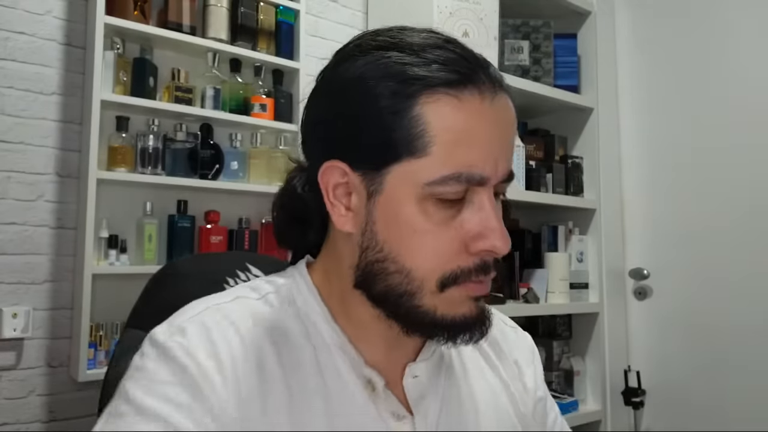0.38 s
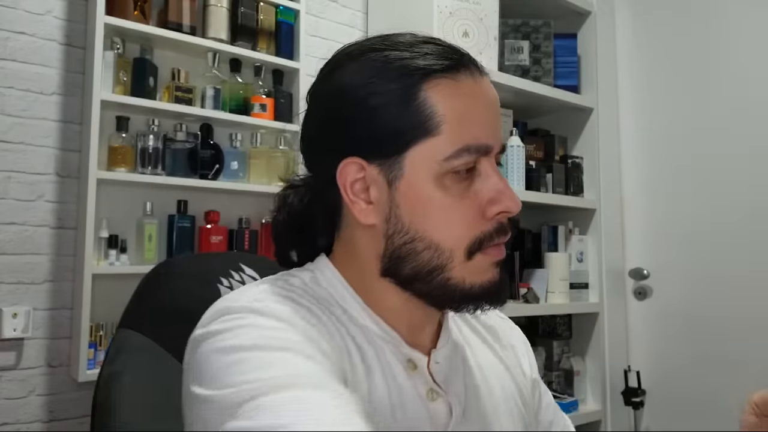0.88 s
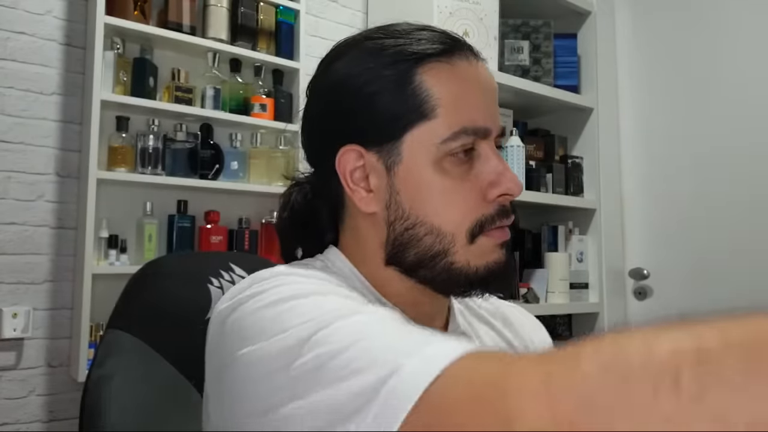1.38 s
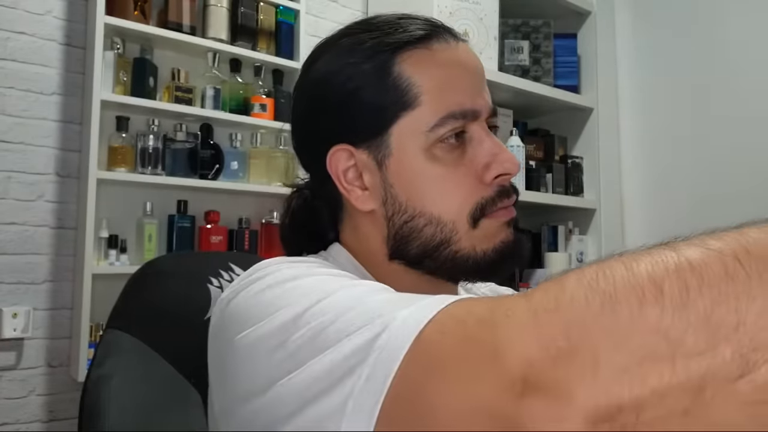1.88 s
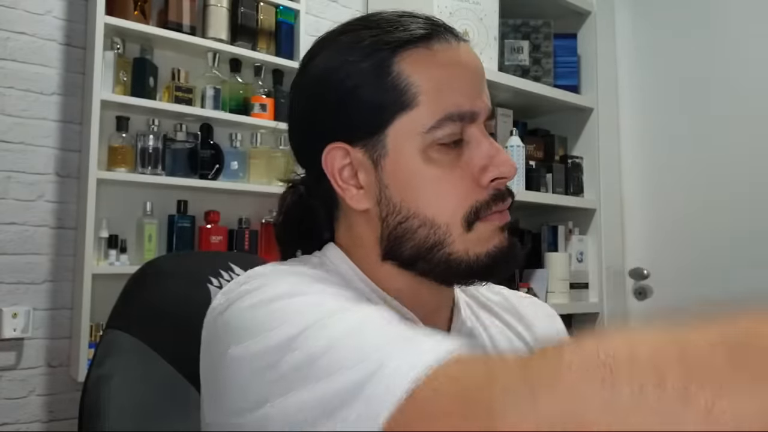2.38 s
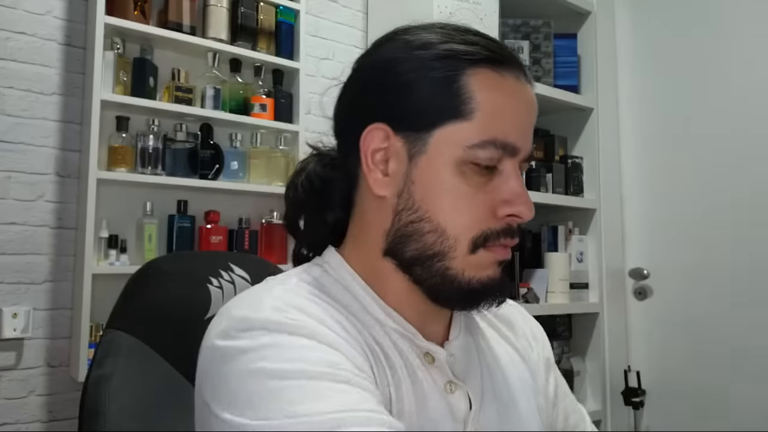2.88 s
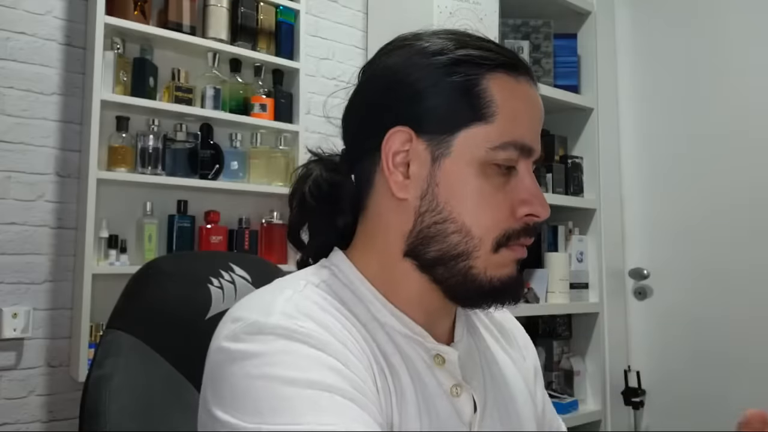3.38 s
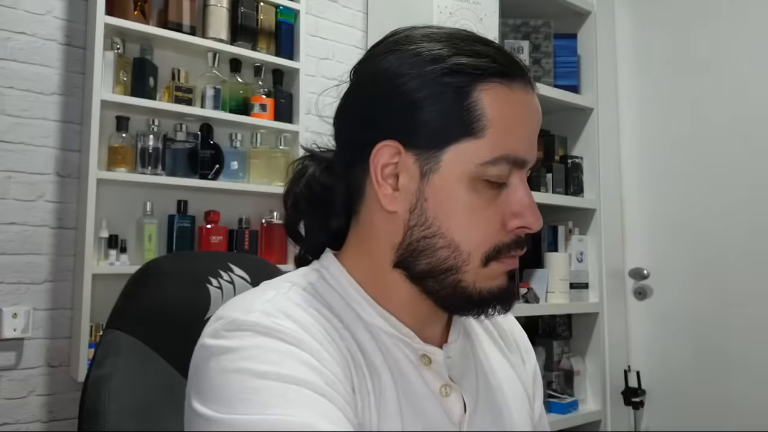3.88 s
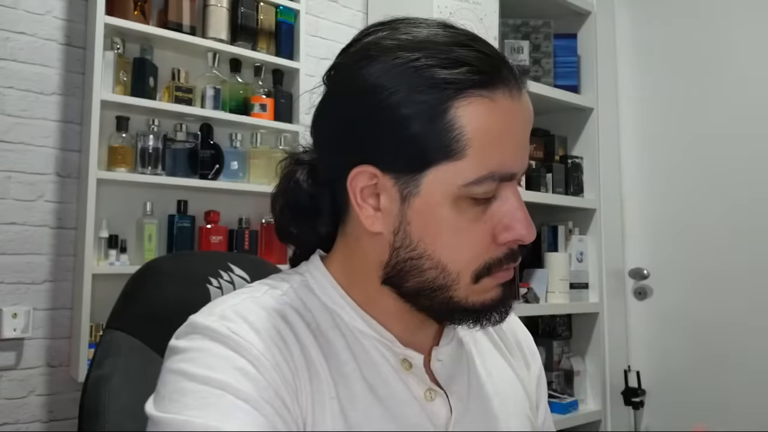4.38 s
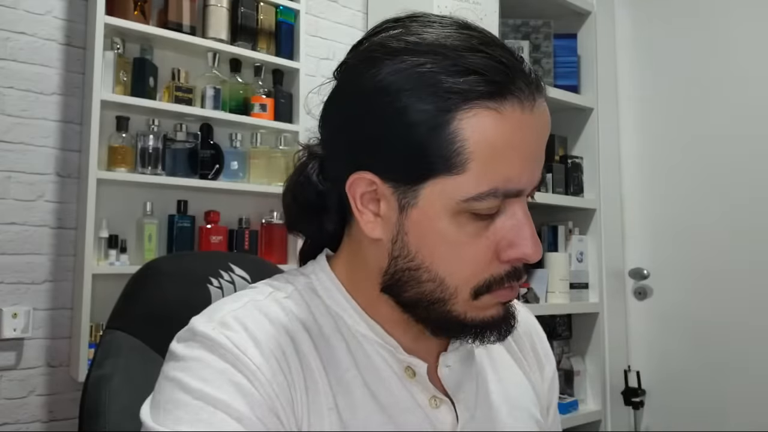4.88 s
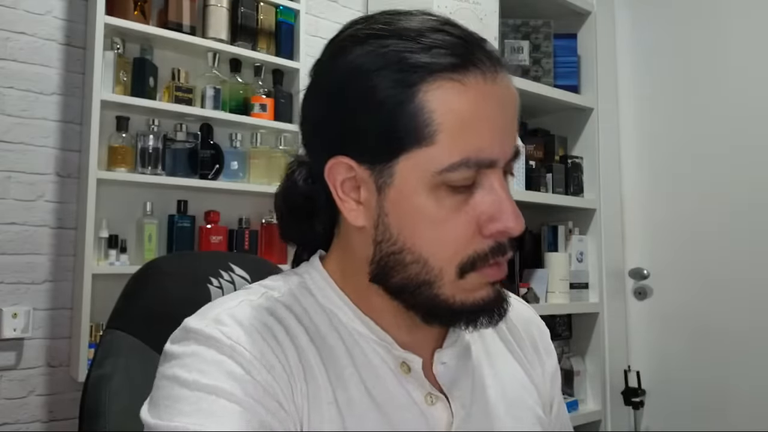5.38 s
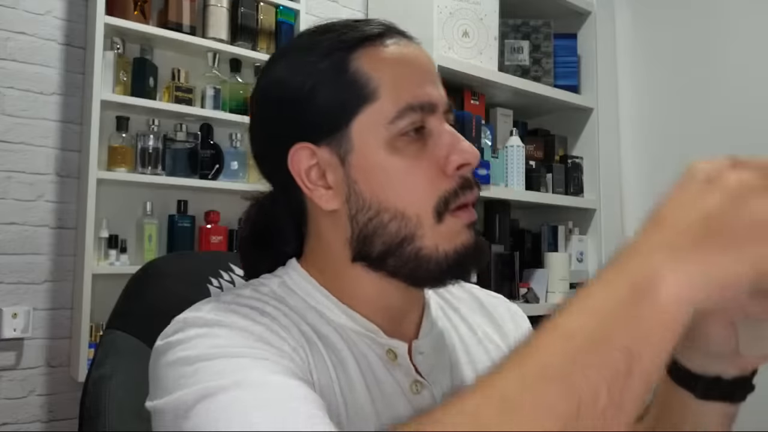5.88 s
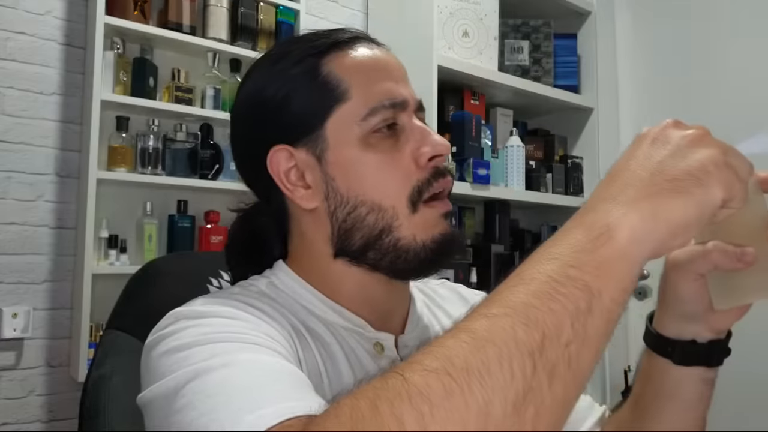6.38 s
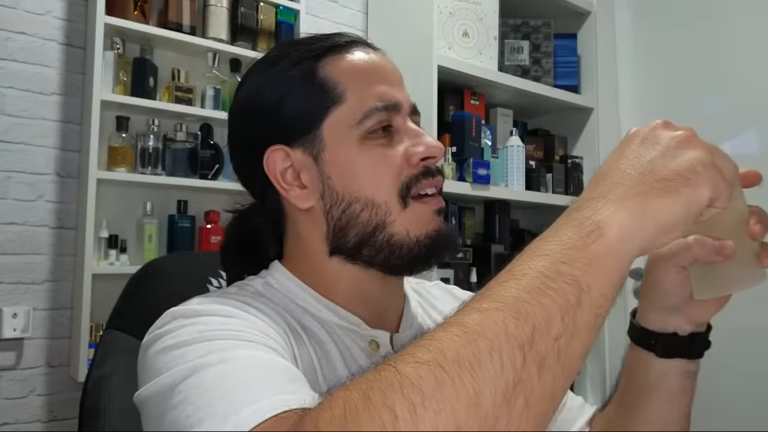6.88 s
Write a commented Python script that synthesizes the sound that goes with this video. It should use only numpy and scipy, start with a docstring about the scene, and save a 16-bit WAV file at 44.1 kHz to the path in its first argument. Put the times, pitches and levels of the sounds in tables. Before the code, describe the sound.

In a small quiet room, cloth rustles, a cap clicks off, a bottle knocks heavily on a wooden desk, then chirps and short spray puffs.

```python
"""Bottle and cap at a desk

A glass bottle and its cap are handled at a wooden desk in a small furnished room, over a low wavering rumble.
Knocks ring the desk top's modes and add a woody clack and bursts of noise; the cap slips off in dying rattles.
Hands and sleeves rustle in strokes of noise, and small ticks and peeps are scratches in narrow resonances.
Thin chirps are whistles with a rasp around them, and the pump's puffs are short bursts of bright hiss."""
import sys
import numpy as np
from scipy import signal
from scipy.fft import rfft, irfft, next_fast_len
from scipy.io import wavfile

SR = 44100
rng = np.random.default_rng(int(sys.argv[2]) if len(sys.argv) > 2 else 0)


def wav_record(signal):
    """Record a signal, one row per channel, as 16-bit PCM in the file named by sys.argv[1]."""
    frames = np.transpose(np.atleast_2d(signal))
    bounded = np.clip(frames, -1, 1)
    # unit amplitude maps onto the largest positive 16-bit level
    quanta = np.round(bounded * 32767).astype(np.int16)
    wavfile.write(sys.argv[1], SR, quanta)


def voltage_ratio(decibels):
    """Convert decibels (scalar or array-like) to amplitude ratios, 20 dB per decade."""
    exponent = np.asarray(decibels, float) / 20
    return 10 ** exponent


N = 319266   # length in samples


def rms_one(x):
    """Scale a sound so that its rms, a kind of average strength, is 1."""
    return x / np.sqrt(np.mean(x ** 2) + 1e-20)


def in_time(rows):
    """Join the points of a table with straight lines and give each column sample by sample."""
    s, *columns = np.transpose(rows)
    return [np.interp(np.arange(N) / SR, s, column) for column in columns]


def while_on(rows, release_s=0.0025):
    """One between the first and last time of a table, zero outside, with sloping edges."""
    t = np.arange(N) / SR
    inside_s = np.minimum(t - rows[0][0], rows[-1][0] - t)
    return np.clip(1 + inside_s / release_s, 0, 1)


def at_hz(points, hz):
    """Read a table between its points, on a log-frequency axis."""
    table_hz, values = np.array(points).T
    return np.interp(np.log(np.maximum(hz, 1)), np.log(table_hz), values)


def coloured(spectrum):
    """Noise shaped to the given spectrum, with rms 1."""
    size = next_fast_len(N)
    shape = voltage_ratio(at_hz(spectrum, np.fft.rfftfreq(size, 1 / SR)))
    white = rng.standard_normal(size)
    return rms_one(irfft(rfft(white) * shape, size)[:N])


def drift(rate_hz):
    """Smooth random wandering with rms 1, made of noise with its faster changes filtered away."""
    r = np.exp(-2 * np.pi * rate_hz / SR)
    wander = signal.lfilter([1], [1, -2 * r, r * r], rng.standard_normal(N + SR))
    return rms_one(wander[SR:])   # the first second lets the filter settle


def resonance(x, hz, width_hz):
    """One resonance: it passes sound near its pitch, with gain 1 on top."""
    r = np.exp(-np.pi * max(width_hz, 10) / SR)
    turn = 2 * np.pi * hz / SR
    return signal.lfilter([(1 - r * r) / 2, 0, (r * r - 1) / 2], [1, -2 * r * np.cos(turn), r * r], x)


def dull(x, cut_hz):
    """Take away the treble with a steep low-pass."""
    return signal.sosfilt(signal.butter(4, cut_hz, fs=SR, output="sos"), x)


def dying(times, level_db, t60):
    """Gain that rises within about a millisecond at each blow and dies by 60 dB in t60 seconds."""
    clicks = np.zeros(N)
    clicks[(times * SR).astype(int)] = voltage_ratio(level_db)
    fall = signal.lfilter([1], [1, -voltage_ratio(-60 / (t60 * SR))], clicks + 1e-18)
    return signal.lfilter([.025], [1, -.975], fall)   # softens the start


def strokes(times, peak_db, swell_s, fade_s):
    """Gain over time of separate strokes, each swelling to its peak and fading."""
    drop_db = 23      # loss one swell before the peak and one fade after it
    roundness = 1.2   # 1 is a pointed peak, 2 a round one
    out, t = np.zeros(N), np.arange(N) / SR
    for s, level_db, before, after in zip(times, peak_db, swell_s, fade_s):
        near = slice(max(int((s - 3 * before) * SR), 0), int((s + 3 * after) * SR))
        away = np.maximum((s - t[near]) / before, (t[near] - s) / after)
        out[near] += voltage_ratio(level_db - drop_db * away ** roundness)
    return out


def low_rumble():
    """Bands of noise for hum, rumble and scuff, which waver and swell when the desk is pushed or shaken."""
    # Slow level of the low room sound. Each row: time in seconds, hum level in dB, rumble level in dB.
    low_bed = [(0, -72, -64), (.42, -62, -64), (.85, -73.5, -68.5), (1.1, -57.5, -65.5), (1.3, -58.5, -67),
               (1.55, -73, -69.5), (1.87, -60.5, -64), (2.02, -82, -69), (2.19, -53, -64),
               (2.57, -86, -76.5), (2.82, -53.5, -63), (3.2, -82, -70), (3.68, -74, -71), (4.3, -68, -70.5),
               (4.73, -67.5, -84), (5, -81, -88), (5.23, -68, -68.5), (6.6, -66, -65.5), (6.9, -79, -67.5)]
    # The desk is pushed, brushed or left shaking by knocks. Each row: time of the peak in seconds,
    # hum level in dB, rumble level in dB, swell in seconds, fade in seconds.
    leans = [(.11, -38, -64, 0.071, 0.093), (3.33, -43.5, -54.5, 0.097, 0.16),
             (3.745, -65, -45, .045, 0.045), (4.009, -32, -51, .06, 0.11), (4.21, -43.5, -58, 0.044, 0.062),
             (7.04, -44.5, -49.5, .1, 0.17)]
    # Noise colours. Each row: frequency in Hz, relative level in dB per Hz.
    hum_tone = [(30, -60), (95, -16), (120, 0.5), (150, -14.5), (300, -63)]   # lowest mode of the desk
    rumble_tone = [(94, -30.5), (160, 1.5), (188, -10), (231, -2.5), (259, -7.5), (318, -9), (366, -26.5),
                   (420, -19), (550, -46.5), (920, -120)]
    scuff_tone = [(240, -34.5), (400, -5), (615, 1.5), (996, -14), (1250, -14.5), (2250, -24.5),
                  (2500, -28), (3250, -38.5), (5500, -120)]
    waver_hz, hum_waver_db, rumble_waver_db = 6, 2, 2.5
    scuff_db = -14.5   # scuff level against the rumble

    s, hum_db, rumble_db, swell_s, fade_s = np.transpose(leans)
    bed_hum_db, bed_rumble_db = in_time(low_bed)
    bed_hum = voltage_ratio(bed_hum_db + hum_waver_db * drift(waver_hz))
    bed_rumble = voltage_ratio(bed_rumble_db + rumble_waver_db * drift(waver_hz))
    pushed_hum = strokes(s, hum_db, swell_s, fade_s)
    pushed_rumble = strokes(s, rumble_db, swell_s, fade_s)
    hum = coloured(hum_tone) * (bed_hum + pushed_hum)
    rumble = coloured(rumble_tone) * (bed_rumble + pushed_rumble)
    scuff = coloured(scuff_tone) * voltage_ratio(scuff_db) * (bed_rumble + pushed_rumble)
    return hum + rumble + scuff


def hiss():
    """Steady noise, strongest in the bass."""
    # Colour of the hiss. Each row: frequency in Hz, relative level in dB per Hz.
    hiss_tone = [(18, -45.5), (30, -15), (112, -0.5), (139, -2), (190, -9), (291, -8.5), (409, -20.5),
                 (625, -20), (835, -27), (1420, -33.5), (7670, -43.5), (8760, -36.5), (14100, -43),
                 (15200, -31), (16500, -43.5)]
    return voltage_ratio(-67) * coloured(hiss_tone)


def whine():
    """A thin steady band of high hiss: noise through two equal narrow resonances."""
    hz, width_hz, level_db = 15800, 200, -85.5
    band = resonance(rng.standard_normal(N), hz, width_hz)
    return voltage_ratio(level_db) * rms_one(resonance(band, hz, width_hz))


def rustle():
    """Cloth and skin slide in strokes of bright noise, over a faint uneven rustle."""
    # Strokes. Each row: time of the peak in seconds, peak level in dB, swell in seconds, fade in seconds.
    slides = [(.15, -68.5, 0.18, 0.2), (.35, -59.5, 0.11, .09), (0.499, -69.5, 0.073, 0.067),
              (.65, -72, 0.22, 0.12), (.81, -76, .1, 0.083), (1.15, -71, 0.32, 0.15),
              (1.82, -80, 0.033, 0.099), (2.43, -66.5, 0.023, 0.074), (2.738, -55.5, 0.12, .14),
              (2.96, -74, 0.23, 0.19), (3.43, -65, 0.091, 0.15), (3.729, -67.5, .09, 0.16),
              (4.155, -59, 0.076, .11), (4.35, -66.5, 0.089, 0.18), (4.56, -78, 0.05, .14),
              (4.73, -75, 0.13, .15), (4.88, -57.5, 0.08, 0.08), (5.28, -63, 0.095, 0.1),
              (5.44, -78.5, .04, 0.12), (5.79, -76.5, 0.065, .15), (6.387, -75.5, 0.046, 0.061),
              (6.764, -68.5, 0.026, 0.056), (7.12, -76.5, 0.1, 0.58)]
    # Colour of the rustle. Each row: frequency in Hz, relative level in dB per Hz.
    rustle_tone = [(1760, -54), (3000, -24.5), (4380, -22.5), (5620, -18), (6440, -18.5), (8750, -7.5),
                   (12400, -4), (15100, -3), (16200, -10.5), (16500, -30.5)]
    bed = voltage_ratio(-90 + 5 * drift(5.0))
    moving = strokes(*np.transpose(slides)) + bed
    flutter = voltage_ratio(1.2 * drift(40))
    return coloured(rustle_tone) * moving * flutter


def ring(clicks, hz, t60):
    """A mode rings: a unit click starts a sine of height about 1 that dies by 60 dB in t60 seconds."""
    r, turn = voltage_ratio(-60 / (t60 * SR)), 2 * np.pi * hz / SR
    return signal.lfilter([0, np.sin(turn)], [1, -2 * r * np.cos(turn), r * r], clicks + 1e-18)


def struck(modes, times, level_db, spread_db, contact_s):
    """Every blow strikes every mode with a strength of its own; a soft contact spreads the push."""
    out, luck = 0, rng.standard_normal((len(times), len(modes)))
    for k, (hz, mode_db, t60) in enumerate(modes):
        clicks = np.zeros(N)
        clicks[(times * SR).astype(int)] = voltage_ratio(level_db + mode_db + spread_db * luck[:, k])
        out = out - ring(clicks, hz, t60)
    push = np.hanning(int(contact_s * SR) + 3)
    return np.convolve(out, push / push.sum())[:N]


def rattled(modes):
    """Broad modes kept going by a chattering contact, here plain noise; rms 1."""
    chatter = rng.standard_normal(N)
    return rms_one(sum(voltage_ratio(level_db) * rms_one(resonance(chatter, hz, width_hz))
                       for hz, width_hz, level_db in modes))


def knocks():
    """Blows ring the desk top, with a woody clack and a noisy crack and snap at an uneven contact."""
    # Blows on the desk. Each row: time in seconds, then relative levels in dB from low to high:
    # thud, board, clack, snap.
    blows = [(0.044, -30.5, -69, -84, -74), (.063, -25.5, -60.5, -75, -62), (.099, -36, -70, -78, -71),
             (3.388, -5.5, -23, -48, -49.5), (3.41, -20, -26.5, -42.5, -63),
             (3.431, -15.5, -38.5, -49, -60), (3.771, -30, -41, -38.5, -46),
             (3.777, -2.5, -20.5, -19.5, -18.5), (3.784, -12.5, -20.5, -19, -31.5),
             (3.799, -8, -23, -22, -32.5), (3.809, -10, -28, -28.5, -42.5), (3.826, -15, -30.5, -32, -49),
             (3.862, -16, -22.5, -23, -40.5), (3.888, -2.5, -22, -17, -22), (3.915, -10, -27.5, -28.5, -45),
             (3.943, -9.5, -20.5, -23.5, -23.5), (3.968, -21, -30, -28.5, -46.5),
             (3.979, -13.5, -36, -33, -46.5), (4.158, -34, -45.5, -50.5, -57),
             (4.182, -39.5, -47, -58, -70), (4.201, -47, -65, -64, -71)]
    # Ringing modes of the desk top. Each row: frequency in Hz, relative level in dB, 60 dB decay in seconds.
    desk_modes = [(122, -3, 0.25), (152.4, -8.5, 0.2), (201, -15.5, .1), (215, -4, 0.26), (272, 5, 0.042),
                  (269.4, 6.5, 0.072), (306, 3, 0.1), (435, -8, .08)]
    # Upper modes of the desk top. Each row: frequency in Hz, width in Hz, relative level in dB.
    board_modes = [(497, 60, -4.5), (558.4, 140, 0.5), (652, 47, 1), (771, 59, -13.5)]
    # Bottle foot on wood. Each row: frequency in Hz, width in Hz, relative level in dB.
    clack_modes = [(850, 770, -0.5), (1110, 110, 1.5), (1300, 530, -3.5), (1790, 230, -7.5),
                   (1900, 54, -11)]
    # Contact noise colours. Each row: frequency in Hz, relative level in dB per Hz.
    crack_tone = [(1290, -39), (2200, -3.5), (2700, 5), (2980, -5), (3500, 2), (5750, -8), (8000, -13.5),
                  (10400, -44.5), (17600, -120)]
    snap_tone = [(4410, -34.5), (7500, -14.5), (8530, 2), (10400, -7.5), (12000, 2.5), (14200, -1),
                 (15200, -2), (15900, 1), (16500, -21)]

    s, thud_db, board_db, clack_db, snap_db = np.transpose(blows)
    clack_share = 0.42   # the crack's level lies between those of clack and snap
    crack_db = clack_share * clack_db + (1 - clack_share) * snap_db
    thud = dull(struck(desk_modes, s, thud_db - 14.5, spread_db=4.5, contact_s=.002), 830)
    board = dull(rattled(board_modes) * dying(s, board_db + 3.0, t60=0.05), 990)
    clack = dull(rattled(clack_modes) * dying(s, clack_db, t60=0.056), 2200)
    # crack and snap each have a quick part and a slower tail
    crack_gain = dying(s, crack_db + 6, t60=0.0019) + dying(s, crack_db - 2.5, t60=.03)
    snap_gain = dying(s, snap_db + 2.5, t60=0.011) + dying(s, snap_db - 8.0, t60=0.035)
    crack = coloured(crack_tone) * crack_gain
    snap = coloured(snap_tone) * snap_gain
    uneven = voltage_ratio(2.5 * drift(150))
    return thud + (board + clack + crack) * uneven + snap


def scratches(table, ring_db, edge_db):
    """A dying scratch of noise in one resonance, with a broad edge at the start and a longer thin ring."""
    out, t = np.zeros(N), np.arange(12000) / SR
    for s, level_db, hz, width_hz, t60 in table:
        scratch = rng.standard_normal(len(t))
        tone = rms_one(resonance(resonance(scratch, hz, width_hz), hz, 2 * width_hz))
        tone = tone * voltage_ratio(-60 * t / max(t60, .01))
        edge = voltage_ratio(edge_db - 60 * t / 0.013) * rms_one(resonance(scratch, 3000, 5000))
        thin = rms_one(resonance(resonance(scratch, 2000, 260), 2000, 500))
        thin = thin * voltage_ratio(ring_db - 60 * t / 0.53)
        attack = np.minimum(t / 0.00062, 1)
        i = int(s * SR)
        out[i:i + len(t)] += voltage_ratio(level_db - 9) * attack * (tone + edge + thin)
    return out


def ticks():
    """Small things tick: short scratches with a clear broad edge."""
    # Each row: start in seconds, relative level in dB, pitch in Hz, width in Hz, 60 dB decay in seconds.
    small_ticks = [(.489, -47, 1006, 200, 0.094), (.71, -64.5, 1140, 600, 0.14),
                   (.762, -59, 1200, 300, 0.29), (1.087, -58.5, 1300, 890, 0.17),
                   (1.32, -64.5, 2660, 2470, 0.047), (1.553, -59.5, 2160, 2320, 0.094),
                   (1.81, -70.5, 1500, 1500, 0.39), (1.86, -55, 4400, 990, 0.095),
                   (1.893, -60.5, 3560, 1200, 0.084), (1.943, -63, 2310, 1190, 0.2),
                   (2.382, -60.5, 7000, 400, 0.13), (2.6, -67.5, 1900, 1460, 0.087),
                   (3.143, -61, 1200, 204, 0.15), (4.891, -61.5, 3800, 910, 0.31),
                   (4.934, -65.5, 1800, 300, 0.14)]
    return scratches(small_ticks, ring_db=-19, edge_db=-9.5)


def cap():
    """The cap is pulled off its catch: quick slips of plastic on metal, each a dying rattle of noise."""
    # Slips. Each row: time in seconds, relative level in dB, 60 dB decay in seconds.
    slips = [(2.863, -42, 0.086), (2.872, -21.5, 0.082), (2.88, -15.5, 0.038), (2.9, -30, 0.16)]
    # Colour of the rattle. Each row: frequency in Hz, relative level in dB per Hz.
    cap_tone = [(120, -18.5), (200, -6.5), (279, -5.5), (389, -20.5), (799, -6.5), (961, -0.5),
                (1160, -14.5), (1470, -1), (1870, -8.5), (2800, -23), (3190, -20), (9660, -35),
                (15300, -24), (16500, -42)]
    gain = sum(dying(np.array([s]), level_db - 12.5, max(t60, .005)) for s, level_db, t60 in slips)
    return coloured(cap_tone) * gain


def peeps():
    """Faint short peeps: scratches in one narrow resonance with hardly any thin ring."""
    # Each row: start in seconds, relative level in dB, pitch in Hz, width in Hz, 60 dB decay in seconds.
    faint_peeps = [(3.155, -62, 3310, 350, 0.15), (5.473, -57, 3460, 172.3, .18)]
    return scratches(faint_peeps, ring_db=-40, edge_db=1)


def chirps():
    """A mostly falling whistle, with rasp made by shaking its strength with noise."""
    # One list of rows per chirp. Each row: time in seconds, pitch in Hz, whistle level in dB, rasp level in dB.
    chirp_curves = [
        [(5.785, 5470, -82, -67), (5.795, 5340, -65, -63), (5.835, 4176, -63, -56), (5.885, 3810, -67, -50),
         (5.897, 3650, -48, -60), (5.92, 3720, -82, -82)],
        [(6.02, 4100, -70, -72), (6.028, 3790, -61.5, -57), (6.045, 3496, -40, -60), (6.062, 3215, -49, -54.5),
         (6.075, 3340, -57, -63)],
    ]
    out = 0
    for rows in chirp_curves:
        hz, whistle_db, rasp_db = in_time(rows)
        wobbling_hz = hz + 50 * drift(146)
        carrier = np.sqrt(2) * np.sin(2 * np.pi * np.cumsum(wobbling_hz) / SR)
        rasp_filter = signal.butter(3, 950, fs=SR, output="sos")   # rasp reaches about 950 Hz to each side
        rasp = rms_one(signal.sosfilt(rasp_filter, rng.standard_normal(N)))
        out = out + carrier * (voltage_ratio(whistle_db) + voltage_ratio(rasp_db) * rasp) * while_on(rows)
    # a firm lower edge to the sound
    return signal.sosfilt(signal.cheby2(8, 40, 2780, "high", fs=SR, output="sos"), out)


def puffs():
    """Liquid forced through the nozzle: bright hiss that spits a little, sags with the pressure and shuts off."""
    # Puffs of the pump. Each row: start in seconds, length in seconds, level in dB before the sag.
    pump_strokes = [(6.218, 0.03, -58.5), (6.265, 0.031, -44), (6.635, 0.028, -44)]
    # Colour of the spray. Each row: frequency in Hz, relative level in dB per Hz.
    puff_tone = [(760, -37), (1300, -23), (2280, -22), (2460, -14.5), (3850, -10.5), (7510, -14.5),
                 (8360, -6.5), (11400, 0), (15200, -0.5), (16000, 1), (16500, -19)]
    attack_s, sag_db_per_s, extra_release_db_per_s = 0.014, 113, 800
    t, gain = np.arange(N) / SR, 0
    for s, length_s, level_db in pump_strokes:
        since = np.maximum(t - s, 0)
        after_end = np.maximum(since - length_s, 0)
        loss_db = sag_db_per_s * since + extra_release_db_per_s * after_end
        gain = gain + np.minimum(since / attack_s, 1) * voltage_ratio(level_db - loss_db)
    spit = voltage_ratio(1.33 * drift(300))
    return coloured(puff_tone) * gain * spit


def room(x):
    """Diffuse echoes: octave bands of noise, each dying at its own pace, after a short gap."""
    # Echo decay of the room. Each row: frequency in Hz, time to die by 60 dB in seconds.
    room_t60 = [(100, 0.27), (300, 0.28), (1000, 0.17), (3000, 0.2), (8000, 0.18), (15000, 0.19)]
    t, tail = np.arange(SR // 2) / SR, 0
    onset = np.clip((t - .003) / 0.0026, 0, 1)
    for low in 62.5 * 2. ** np.arange(8):
        octave = signal.butter(2, [low, 2 * low], "band", fs=SR, output="sos")
        band = signal.sosfilt(octave, rng.standard_normal(len(t)))
        band = band * voltage_ratio(-60 * t / at_hz(room_t60, low * np.sqrt(2))) * onset
        tail = tail + band * np.sqrt(low / np.sum(band ** 2) / 16000)   # energy in step with bandwidth
    return voltage_ratio(-7) * signal.fftconvolve(x, tail)[:N]


def scene():
    """Everything handled, and the chirps and peeps, come direct and through the room over the background."""
    background = low_rumble() + hiss() + whine() + rustle()
    direct = knocks() + ticks() + cap() + peeps() + chirps() + puffs()
    events = direct + room(direct)
    # small things radiate no deep bass
    events = signal.sosfilt(signal.cheby2(8, 55, 72, "high", fs=SR, output="sos"), events)
    return (events + background)[None]


def band_limit(x):
    """A steep low-pass at the top of the band."""
    return signal.sosfilt(signal.butter(12, 17140, fs=SR, output="sos"), x)


def record(dry):
    """The loudest peaks are rounded and the top of the band is cut."""
    rounded = .95 * np.tanh(dry / .95)
    mix = signal.sosfilt(signal.cheby2(10, 30, 16500, fs=SR, output="sos"), rounded)
    return band_limit(mix)


dry = scene()
out = record(dry)
wav_record(out)
```